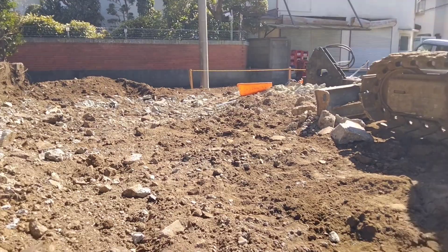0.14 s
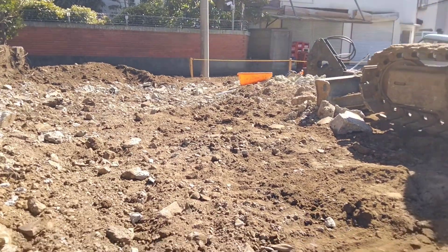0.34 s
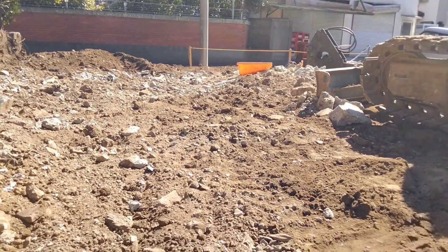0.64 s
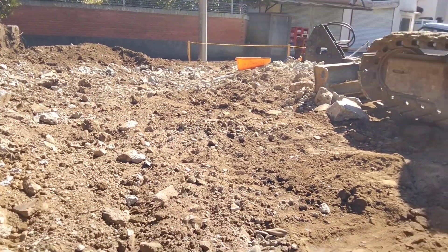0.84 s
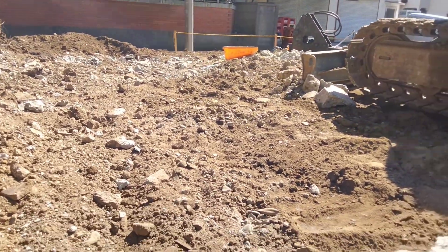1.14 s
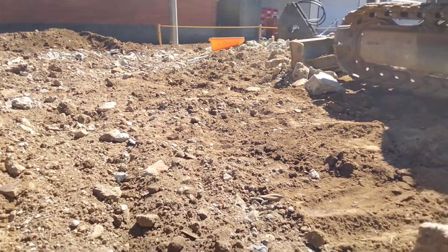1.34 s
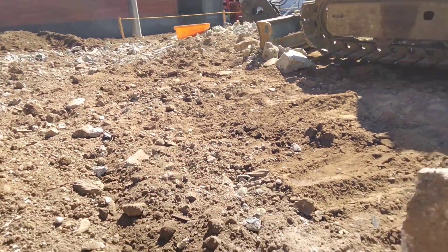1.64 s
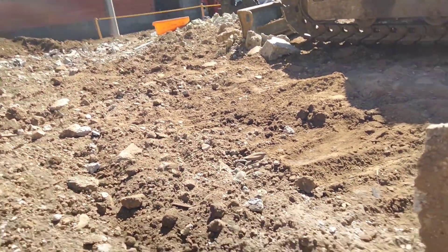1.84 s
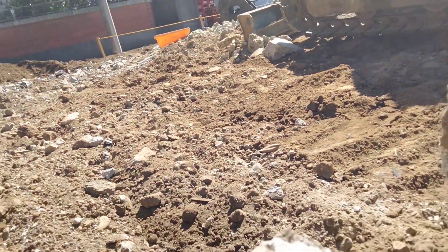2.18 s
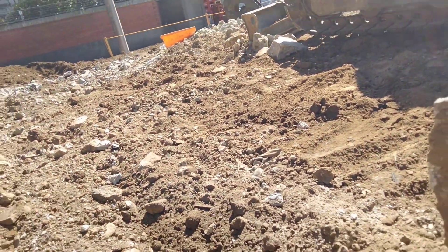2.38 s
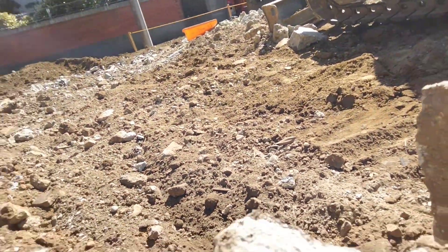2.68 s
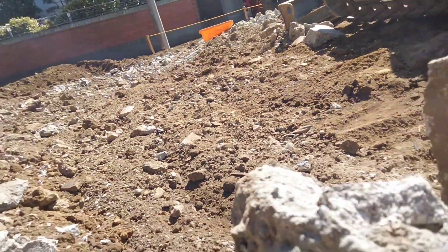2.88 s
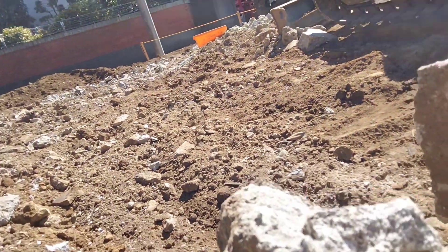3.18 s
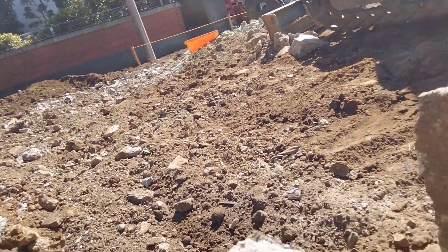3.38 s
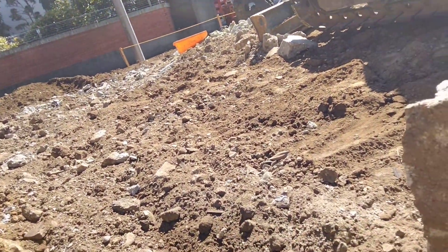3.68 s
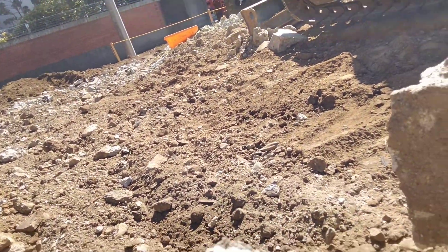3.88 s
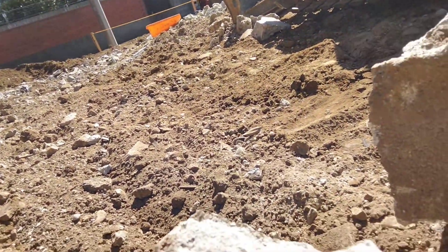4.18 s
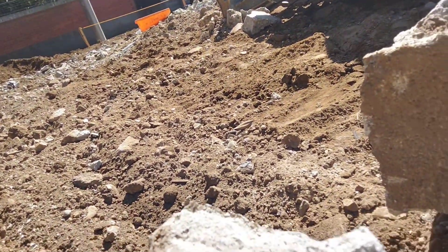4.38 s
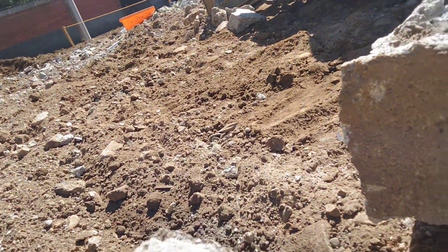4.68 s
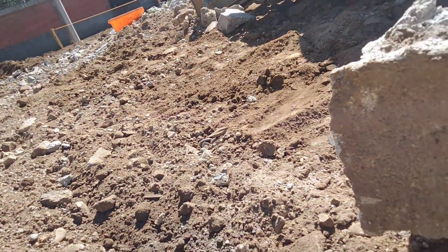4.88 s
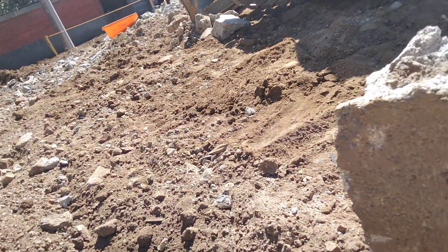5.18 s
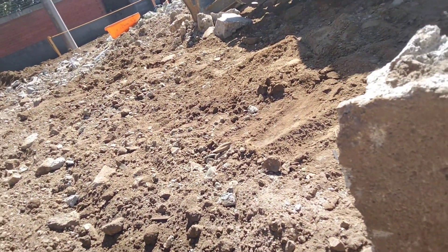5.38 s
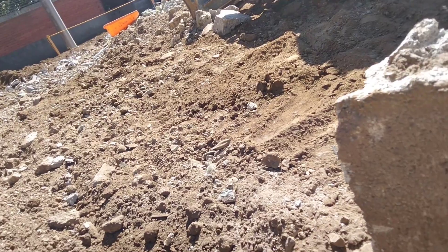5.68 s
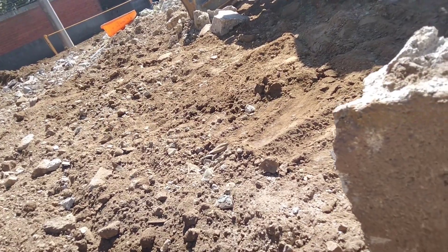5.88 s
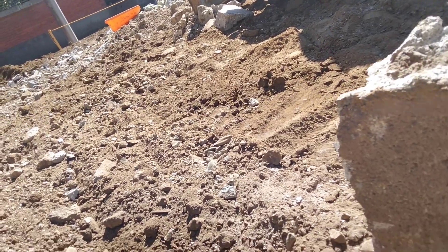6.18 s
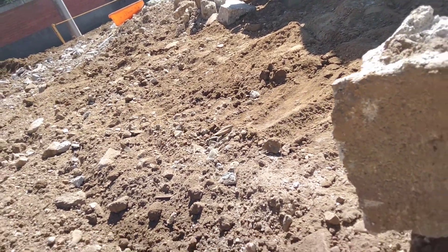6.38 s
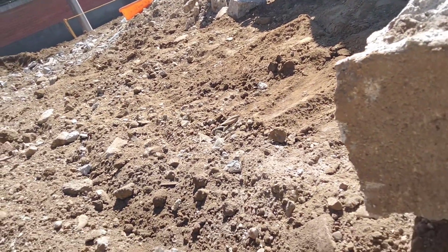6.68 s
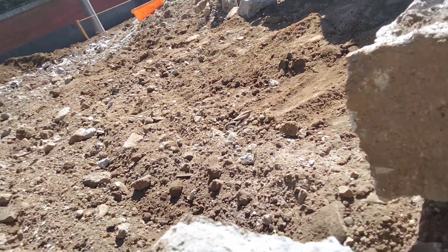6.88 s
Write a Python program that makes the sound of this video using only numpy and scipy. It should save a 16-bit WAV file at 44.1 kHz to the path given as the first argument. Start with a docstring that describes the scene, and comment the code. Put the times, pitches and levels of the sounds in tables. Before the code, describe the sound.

Irregular footsteps grind across an open rubble lot, heard very close in stereo. Busy crunching and small knocks come first, then a sparser, dustier stretch with light shuffles and a small hollow clack. Heavier crunches return, a fragment squeaks sharply, a lump lands with a prominent thud, and final scrapes crackle away. Far-off town noise stays barely audible beneath.

```python
"""Shoes shift and step on loose dirt and broken concrete at an open site, close by.
Each slide drags grit over stone: showers of tiny clicks, coloured as dust, grit, gravel and soil.
Crumbs crack in short bursts and ringing shards; lumps knock on the packed soil as brief sagging tones.
Dragged fragments screech as rubbed resonances, and one hollow piece rings in several tones.
A far town rumbles faintly as steady coloured noise; the yard adds a short, faint tail to the feet."""
import sys
import numpy as np
from scipy import signal
from scipy.fft import rfft, irfft
from scipy.io import wavfile

SR = 44100
rng = np.random.default_rng(int(sys.argv[2]) if len(sys.argv) > 2 else 0)


def transcribe(signal):
    """Save signal, clipped to [-1, 1], as a 16-bit WAV file at the path in sys.argv[1]."""
    frames = np.atleast_2d(signal).T
    limited = np.clip(frames, -1, 1)
    pcm = np.round(limited * 32767).astype(np.int16)
    wavfile.write(sys.argv[1], SR, pcm)


N = 310023
TIME = np.arange(N) / SR   # s

# slides of the sole over the rubble:
# [start t/s, swell t/s, ease t/s, relative level of the grit/dB, weight on the sole (0-1)]
SLIDES = [(0.036, 0.019, 0.041, -37.5, 0.88), (0.228, 0.003, 0.095, -39, 0.5),
          (0.326, .052, 0.1, -31, 0.46), (0.5, 0.048, 0.05, -30.5, 0.16), (0.627, .006, 0.099, -28.5, 0.76),
          (0.767, 0.026, 0.056, -37, 0.27), (0.903, 0.027, 0.028, -30, 0.42),
          (0.96, 0.015, 0.2, -27.5, 0.61), (1.225, 0.038, 0.14, -32, 0.69), (1.37, 0.022, 0.22, -39, 0.64),
          (1.577, 0.066, 0.061, -37.5, 0.24), (1.716, 0.048, 0.022, -36, 0.92),
          (1.866, 0.04, .078, -39.5, .3), (2.091, 0.0055, 0.0067, -31, 0.06),
          (2.164, 0.037, 0.0087, -38, 0.44), (2.275, 0.0057, 0.02, -41.5, 0),
          (2.479, 0.082, 0.019, -32.5, 0.57), (2.622, 0.024, 0.028, -44.5, 0.5),
          (2.843, 0.083, 0.025, -35, 0.08), (2.996, 0.013, 0.015, -33, 0.03),
          (3.072, 0.053, 0.11, -36, 0.44), (3.309, 0.026, 0.045, -36.5, 0),
          (3.673, 0.099, 0.075, -39, 0.58), (4.011, 0.07, 0.016, -33.5, 0.95),
          (4.096, 0.1, .013, -27.5, 0.56), (4.244, 0.024, .036, -36.5, 0.75),
          (4.333, 0.11, 0.023, -31.5, .35), (4.491, .011, 0.047, -35.5, 0.54),
          (4.668, 0.14, .084, -29, 0.53), (4.83, 0.019, 0.045, -21.5, 0.68),
          (5.226, .006, 0.07, -41.5, 0.1), (5.337, 0.0038, 0.051, -34.5, 0.6),
          (5.45, 0.048, 0.048, -30.5, 0.33), (5.546, 0.0063, 0.12, -41, 1), (5.863, 0.13, 0.07, -40.5, 0.1),
          (6.16, 0.13, 0.051, -42, 0.61), (6.329, 0.04, 0.11, -26, 0.27), (6.497, 0.017, 0.03, -21.5, .15),
          (6.576, .017, .11, -39, 0.65), (6.754, 0.049, .12, -38.5, 0.65)]
CRACK_S = 0.0037   # a crumb fails this fast
CRACK_BODY_DB = (-31.5, -1.5)   # gravel relative to grit, for the smallest and the largest crumb


def from_db(db):
    """Turn decibels into a plain gain."""
    return 10 ** (np.asarray(db) / 20)


def rms_one(x):
    """Scale a signal to an average (rms) strength of 1."""
    return x / np.sqrt(np.mean(x ** 2) + 1e-20)


def panned(balance_db):
    """Left and right gains of equal total power; positive is louder on the left."""
    return rms_one(from_db(np.array([[.5], [-.5]]) * balance_db))


def flutter(rate_hz):
    """Slow random wavering with spread 1: noise smoothed twice."""
    r = np.exp(-2 * np.pi * rate_hz / SR)
    noise = rng.standard_normal(N + SR)
    smooth = signal.lfilter([1], [1, -2 * r, r * r], noise)
    return rms_one(smooth[SR:])   # the first second lets the filter settle


def grains(per_s, spread_db, alike):
    """Clicks of uneven size at random moments, partly shared by the two sides (alike 0-1); rms 1."""
    size_db = spread_db * np.minimum(rng.exponential(1, (3, N)), 4.5)
    sizes = from_db(size_db) * rng.standard_normal((3, N))
    clicks = sizes * (rng.random((3, N)) < per_s / SR)
    shared, separate = clicks[0], clicks[1:]
    return rms_one(np.sqrt(alike) * shared + np.sqrt(1 - alike) * separate)


def response(points):
    """Echo-like filter through the (f/Hz, level/dB) points that acts as early as it can (minimum phase)."""
    taps = 4096
    hz, db = np.transpose(points)
    grid = np.maximum(np.fft.rfftfreq(taps, 1 / SR), 1)
    level_db = np.interp(np.log(grid), np.log(hz), db)
    # folding the cepstrum forward in time gives the minimum phase
    cepstrum = irfft(np.log(from_db(level_db)))
    cepstrum[1:taps // 2] *= 2
    cepstrum[taps // 2 + 1:] = 0
    return irfft(np.exp(rfft(cepstrum)))


def sounded(drive, gain, left, right):
    """Scale a stereo drive by its gain, then give each side its colour at unchanged average power."""
    pair = np.array([response(left), response(right)])
    pair = rms_one(pair) / np.sqrt(pair.shape[1])
    return signal.oaconvolve(drive * gain, pair, axes=1)[:, :N]


def resonance(x, hz, width_hz):
    """Two-pole resonance with gain 1 at its peak, like a small object with one pitch."""
    r = np.exp(-np.pi * width_hz / SR)
    top = np.array([1, 0, -1]) * (1 - r * r) / 2
    bottom = [1, -2 * r * np.cos(2 * np.pi * hz / SR), r * r]
    return signal.lfilter(top, bottom, x + 1e-18)


def far_town():
    """Countless overlapping clicks blur into a steady far rumble; a faint steady hiss, peaking near 9 kHz, lies
    over it."""
    # colour of the rumble and hiss: [f/Hz, relative level/dB]
    town_colour = [(25, -15.5), (60, -4.5), (110, -0.5), (190, 2), (300, -9.5), (600, -13.5), (1300, -22),
                   (3000, -19), (6000, -25), (9000, -15), (12000, -30.5), (15500, -24)]
    noise = grains(per_s=40000, spread_db=2.0, alike=0.43)
    return panned(-10) * sounded(noise, from_db(-61), town_colour, town_colour)


def crack_force(cracks, crumble_db, crumble_s, strain_s):
    """A crumb strains, fails in a quick burst, and its bits settle: gains of grit and gravel."""
    gains = np.zeros((2, N))
    for s, db, size in cracks:
        span = slice(max(0, int((s - .015) * SR)), int((s + 0.067) * SR))
        age = TIME[span] - s - CRACK_S / 2
        burst = np.exp(-np.abs(2 * age / CRACK_S) ** 2)
        fade_s = np.where(age < 0, strain_s, crumble_s)
        skirt = from_db(crumble_db) * np.exp(-np.abs(age) / fade_s)
        body_db = np.interp(size, [0, 1], CRACK_BODY_DB)   # big crumbs have more body
        gains[:, span] += from_db([[db], [db + body_db]]) * np.maximum(burst, skirt)
    return gains


def shards(cracks, level_db, ring_s, scatter_octaves):
    """Every crumb splits into three shards that ring briefly, lower on average the larger the crumb."""
    middle_hz = (8390, 2260)   # for the smallest and the largest crumb, before the scatter
    out = np.zeros((2, N))
    luck = rng.uniform(-1, 1, (len(cracks), 3, 3))
    for (s, db, size), pieces in zip(cracks, luck):
        span = slice(int(s * SR), int((s + .05) * SR))
        body_db = np.interp(size, [0, 1], CRACK_BODY_DB)
        gain = from_db(db + body_db + level_db)
        for pitch, delay, side in pieces:
            hz = np.interp(size, [0, 1], middle_hz) * 2 ** (scatter_octaves * pitch)
            start = s + CRACK_S * (1 + delay) / 2
            lag = np.array([[0], [.0003]]) * side   # the right side hears it earlier or later
            age = np.maximum(TIME[span] - start - lag, 0)
            out[:, span] += gain * np.sin(2 * np.pi * hz * age) * np.exp(-age / ring_s)
    return out * panned(-2)


def slide_force(edge_db, rise_s, fall_s):
    """Slides bite, swell, ease and stop; weight presses deeper: gains of grit, gravel and soil."""
    # level relative to the grit, under a light foot and under a heavy one
    gravel_share_db, soil_share_db = (-17.5, -5.5), (-21.5, -7)
    gains = np.zeros((3, N))
    for start, swell, ease, db, weight in SLIDES:
        times = start - rise_s + np.cumsum(np.abs([0, rise_s, swell, ease, fall_s]))
        span = slice(max(0, int(times[0] * SR)), int(times[-1] * SR))
        shape = from_db(db + np.interp(TIME[span], times, [-35, edge_db, 0, edge_db, -32]))
        gravel_db = np.interp(weight, [0, 1], gravel_share_db)
        soil_db = np.interp(weight, [0, 1], soil_share_db)
        shares = from_db([0, gravel_db, soil_db])[:, None]
        gains[:, span] = np.maximum(gains[:, span], shares * shape)
    return gains


def dislodged(force, per_s, level_db, spread_db, top_db):
    """Small things give way at random under a sliding sole: rows [t/s, level/dB, size (0-1)]."""
    when, luck, size, strength = rng.random((600, 4)).T
    s = when * TIME[-1]   # loose pieces lie everywhere; only a few of those under a slide give way
    pressed = np.interp(s, TIME, force)
    db = 20 * np.log10(pressed + 1e-9) + level_db + spread_db * (2 * strength - 1)
    db = np.minimum(db, top_db)
    gives_way = (luck < per_s * TIME[-1] / len(s)) & (pressed > 0)
    return np.transpose([s, db, size])[gives_way]


def under_sole(x, echo, gap_s):
    """Sound bounces between sole and stone; each slide finds a new gap and so a new colour."""
    slide = np.searchsorted(np.sort(np.array(SLIDES)[:, 0]), TIME)
    lags = gap_s * SR * rng.uniform(.5, 2, len(SLIDES) + 1)
    lag = lags.astype(int)[slide]
    bounces = (echo ** k * x[:, np.arange(N) - k * lag] for k in range(4))
    return rms_one(sum(bounces))


def pebbles(gain, per_s, width_hz, turnover_db):
    """Pebbles tick at pitches of their own; different ones come under the sole as it moves."""
    out = np.zeros((2, N))
    for k, hz in enumerate(np.geomspace(750, 7500, num=18)):
        busy = np.interp(TIME, np.linspace(0, TIME[-1], 90), rng.standard_normal(90))
        ticks = (rng.random(N) < per_s / SR) * rng.standard_normal(N)
        ticks = ticks * from_db(turnover_db * np.clip(busy, -2, 1.2))
        tick = rms_one(resonance(ticks, hz, width_hz)) * hz ** 0.19   # small stones click more readily
        lag = int(rng.uniform(-1.03, 1) * 0.00027 * SR)   # each has its own time gap between the sides
        out += panned(-2 + 8 * (-1) ** k) * np.array([np.roll(tick, lag), tick])
    return rms_one(out) * gain


def jolt(knocks, level_db, settle_s):
    """Every knock shakes the clods around it, which rattle and come to rest: a gain for the soil."""
    gain = np.zeros(N)
    for s, db, _ in knocks:
        span = slice(int(s * SR), int((s + 0.059) * SR))
        gain[span] += from_db(min(db, -22) + level_db) * np.exp(-(TIME[span] - s) / settle_s)
    return gain


def crunch(force, cracks, knocks, catch_db, judder_db, grit_db, dust_db,
           gravel_db, pebble_db, soil_db, trickle_db, wander_db):
    """Stones catch and slip under the sole, so grit, gravel and soil sound in the same uneven clumps."""
    # ground under the sole: [t/s, coarseness (0 = dust, 1 = gravel)]
    ground = [(0, 1), (2.6, 0.83), (2.85, 0.27), (3.4, 0.38), (3.8, 0.82), (4.75, 0.88), (7, 0.73)]
    # colours of fine grit on each side, dust, gravel and soil: [f/Hz, relative level/dB]
    grit_left, grit_right = [(3600, -33.5), (4600, -53), (5200, -36), (6000, -35.5), (8000, -32.5),
                             (8800, -30.5), (11000, -25), (13000, -21), (15300, -28.5)], [(3600, -55.5), (4800, -20), (5250, -11), (5900, -19.5),
                                                (6500, -7.5), (7700, -7.5), (8450, -5), (9100, 4),
                                                (9950, -10), (10750, -6), (11900, -16), (13200, -16),
                                                (15300, -15.5)]
    dust_colour, gravel_colour, soil_colour = [(5000, -37.5), (8000, -2), (11000, -0.5), (13000, 9),
                                               (15500, 1)], [(600, -9.5), (1200, 0), (1700, 2.5),
                                                             (2300, -1.5), (3100, 6.5), (3500, 1.5),
                                                             (3850, -2.5), (4200, 7.5), (4700, 1.5),
                                                             (6000, -6.5)], [(25, -47), (60, -13),
                                                                             (110, -1), (180, 4),
                                                                             (320, -3.5), (550, -3),
                                                                             (800, -9), (1200, -16),
                                                                             (2200, -26.5)]

    coarse = np.interp(TIME, *np.transpose(ground))
    catch = catch_db * flutter(29.8)
    judder = judder_db * np.clip(flutter(260), -2.5, 2.5)
    slips = from_db(coarse * (catch + judder))
    grit_gain, gravel_gain, soil_gain = force * slips
    grit_crack, gravel_crack = crack_force(cracks, crumble_db=-6, crumble_s=0.0058, strain_s=.0011)

    # loose crumbs keep shifting between steps
    trickle = from_db(trickle_db + 8.3 * np.clip(flutter(13.6), -3, 2)) * slips
    grit_gain = grit_gain + trickle
    gravel_gain = np.hypot(gravel_gain + from_db(-16) * trickle, gravel_crack)
    soil_gain = np.hypot(soil_gain, jolt(knocks, level_db=-13, settle_s=0.0076))

    fine = under_sole(grains(per_s=16000, spread_db=5, alike=0.33), echo=0.53, gap_s=.0007)
    dust = grains(per_s=93000, spread_db=2, alike=.3)
    gravel = under_sole(grains(per_s=2200, spread_db=-1.0, alike=0.063), echo=0.38, gap_s=.0009)
    soil = grains(per_s=1600, spread_db=4.0, alike=0.52)
    burst = under_sole(grains(per_s=40000, spread_db=1.8, alike=0.45), echo=.5, gap_s=.0007)

    grit = fine * grit_gain + burst * grit_crack
    out = from_db(grit_db) * sounded(grit, 0.98, grit_left, grit_right)
    out[0] *= from_db(wander_db * flutter(5.1))   # the far side is shaded more or less as the shoe moves
    dust_gain = grit_gain * (1 - coarse)
    out += from_db(dust_db) * panned(-3.2) * sounded(dust, dust_gain, dust_colour, dust_colour)
    out += from_db(gravel_db) * panned(-5.2) * sounded(gravel, gravel_gain, gravel_colour, gravel_colour)
    out += from_db(pebble_db) * pebbles(gravel_gain, per_s=100, width_hz=153, turnover_db=4.0)
    return out + from_db(soil_db) * panned(-3.5) * sounded(soil, soil_gain, soil_colour, soil_colour)


def thuds(knocks, decay_cycles, sag, level_db, lag_s, lowest_hz):
    """Soil damps a knock within two cycles; the pitch sags as the lump beds in."""
    # dull clods lie to the right, harder stones ahead: [f/Hz, left-right level/dB]
    thud_side = [(290, -35), (420, -19.5), (510, 4.5)]
    out = np.zeros((2, N))
    for s, db, hz in knocks:
        balance_db = np.interp(hz, *np.transpose(thud_side))
        span = slice(int(s * SR), int((s + .04) * SR))
        arrival = np.array([[0], [lag_s]]) * np.sign(balance_db)   # the nearer side hears it first
        cycles = np.maximum(TIME[span] - s - arrival + arrival.min(), 0) * hz
        phase = cycles * (1 - sag) + 2 * sag * (1 - np.exp(-cycles))
        knock = np.sin(2 * np.pi * phase) * cycles ** 0.29 * np.exp(-cycles / decay_cycles)
        out[:, span] += from_db(db + level_db) * panned(balance_db) * knock / np.abs(knock).max()
    return signal.sosfilt(signal.butter(2, lowest_hz, "high", fs=SR, output="sos"), out)


def fragments(level_db, judder_db):
    """Uneven friction drives the resonance of a dragged fragment; a sharp edge screeches."""
    # fragments that ring while dragged: [start t/s, length t/s, f/Hz, width f/Hz, relative level/dB]
    drags = [(0.329, 0.13, 5230, 220, -48.5), (0.63, 0.062, 6640, 350, -37.5),
             (0.961, 0.081, 3000, 420, -38), (1.037, 0.19, 3670, 1100, -43.5),
             (1.395, 0.017, 1760, 130, -41.5), (3.132, 0.16, 2700, 500, -54), (3.15, 0.123, 8800, 450, -39),
             (4.671, 0.03, 466, 90, -36.5), (4.689, 0.21, 5170, 250, -43.5),
             (4.829, 0.055, 4150, 70, -28.5), (4.834, 0.059, 3400, 160, -38),
             (4.827, 0.072, 1470, 450, -40.5), (6.337, 0.053, 836, 260, -46)]
    out = np.zeros((2, N))
    friction = grains(per_s=6000, spread_db=1.5, alike=0.43) * from_db(judder_db * flutter(80))
    for start, length, hz, width_hz, db in drags:
        span = slice(int(start * SR), int((start + length + .04) * SR))
        contact = np.interp(TIME[span] - start, [0, .003, length, length + 0.0074], [0.16, 1, 0.29, 0])
        ringing = rms_one(resonance(friction[:, span] * contact, hz, width_hz))
        out[:, span] += from_db(db + level_db) * ringing * np.sqrt(contact.mean())
    return out * panned(-13.0)


def hollow(chatter_db, chatter_s):
    """A hollow piece is knocked, chatters briefly and rings in several fading tones."""
    # tones of the hollow piece: [f/Hz, relative level/dB, t/s to fade by 60 dB]
    modes = [(277, -5, 0.42), (466, -3.5, 0.23), (564, 6.5, 0.049), (747, 7.5, 0.033), (1010, 3, 0.048),
             (1290, -1, 0.06), (1630, -6, 0.06), (1930, -11.5, .06)]
    blow_s, blow_db = 3.121, -39
    age = TIME[:SR // 2]
    ring = np.zeros(len(age))
    for k, (hz, level_db, t60) in enumerate(modes):
        tone = np.sin(2 * np.pi * hz * age) * from_db(-60 * age / t60)
        ring += from_db(level_db) * tone * (-1) ** k
    contact = from_db(chatter_db) * rng.standard_normal(len(age)) * np.exp(-age / chatter_s)
    contact[0] = 1   # the knock itself
    out = np.zeros(N)
    out[int(blow_s * SR):][:len(age)] = signal.fftconvolve(contact, ring)[:len(age)]
    return from_db(blow_db) * panned(-5.5) * out


def yard(x, wet_db, t60):
    """Rubble and low walls scatter a faint, short tail; t60 is the time in s to fade by 60 dB."""
    age = TIME[:SR // 2]
    tail = rng.standard_normal((2, len(age))) * from_db(-60 * age / t60) * (age > .004)
    tail = rms_one(tail) / np.sqrt(len(age))
    return x + from_db(wet_db) * signal.oaconvolve(x, tail, axes=1)[:, :N]


def scene():
    """Slides break crumbs and turn lumps over: crunching, knocks and rings in the yard, over the town."""
    # crumbs that break at set moments: [t/s, relative level/dB, size (0-1)]
    set_cracks = [(0.007, -21, 0.57), (0.143, -15.5, 0.34), (0.157, -18, 0.52), (0.43, -19, 0),
                  (0.502, -30.5, 0.6), (0.611, -13.5, 0.51), (0.631, -18, 0.8), (0.718, -17.5, 0.5),
                  (0.901, -16.5, 0.35), (0.927, -25, .4), (0.964, -19, 0.67), (1.033, -19, 0.6),
                  (1.168, -29, 0.6), (1.277, -17, 0.51), (1.36, -21, 0.3), (1.402, -18, 0.55),
                  (1.718, -25.5, 0.45), (1.741, -23, 0.67), (2.311, -25.5, 0.43), (2.534, -19.5, 0),
                  (3.37, -36, .35), (3.871, -32, 0.55), (3.899, -32.5, 0.68), (4.066, -18.5, 0.2),
                  (4.197, -18, 0.1), (4.259, -29, 0.6), (4.273, -16, 0.55), (4.486, -12, 0.65),
                  (4.522, -18, 0.69), (4.833, -15, .5), (4.851, -13, 0.3), (4.876, -12.5, 0),
                  (5.343, -10, 0.67), (5.363, -17.5, 0.97), (5.471, -25.5, 0.87), (5.557, -21, 0.6),
                  (6.333, -21, 0.72), (6.376, -14.5, 0), (6.445, -20, 0.46), (6.501, -16, 0.57),
                  (6.727, -27, 0.71), (6.759, -23.5, 0.59), (6.795, -21, 0.59)]
    # lumps that knock on the soil at set moments: [t/s, relative peak level/dB, base pitch f/Hz]
    set_knocks = [(0.175, -22, 305), (0.3828, -25.5, 770), (0.675, -26.5, 293), (0.902, -18, 590),
                  (0.9367, -30.5, 211), (1.035, -17, 764), (1.2355, -29, 712), (1.2773, -20.5, 682),
                  (1.7652, -33, 410), (2.1127, -20.5, 300), (3.025, -27, 252), (3.3111, -32.5, 247),
                  (3.8117, -30.5, 474), (3.9057, -27.5, 630), (4.1266, -25.5, 279.6), (4.2741, -19.5, 810),
                  (4.4872, -25, 524), (4.5065, -23.5, 510), (4.6758, -22, 485), (4.894, -22, 595),
                  (5.3447, -26, 436), (5.3651, -4, 537), (5.3895, -18.5, 510), (6.307, -26, 525),
                  (6.3342, -21, 443), (6.7964, -28, 483), (6.805, -28, 224), (6.8392, -29, 517)]
    force = slide_force(edge_db=-11.0, rise_s=0.0067, fall_s=0.02)
    grit_force, _, soil_force = force

    # small crumbs follow the slide that crushes them, small lumps the press on the soil
    crumbs = dislodged(grit_force, per_s=12, level_db=3.5, spread_db=2.5, top_db=-29)
    lumps = dislodged(soil_force, per_s=8, level_db=6.5, spread_db=5, top_db=-28)
    small_knocks = [(s, db, np.interp(size, [0, 1], (250, 850))) for s, db, size in lumps]   # pitch in Hz
    cracks = list(set_cracks) + list(crumbs)
    knocks = list(set_knocks) + small_knocks

    feet = crunch(force, cracks, knocks, catch_db=4.0, judder_db=1.5, grit_db=-2.5, dust_db=-4.0,
                  gravel_db=-4.5, pebble_db=-8.0, soil_db=-1.5, trickle_db=-62, wander_db=5)
    feet += shards(cracks, level_db=-7, ring_s=.003, scatter_octaves=.8)
    feet += thuds(knocks, decay_cycles=0.38, sag=0.52, level_db=-1.0, lag_s=0.00015, lowest_hz=133)
    feet += fragments(level_db=-0.5, judder_db=2.5)
    feet += hollow(chatter_db=-26.5, chatter_s=0.014)
    return yard(feet, wet_db=-21.5, t60=0.23) + far_town()


def record(dry):
    """The treble is cut steeply above 15750 Hz."""
    lowpass = signal.ellip(12, .2, 70, 15750, fs=SR, output="sos")
    return signal.sosfilt(lowpass, dry)


dry = scene()
out = record(dry)
transcribe(out)
```